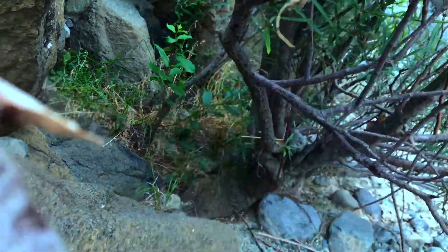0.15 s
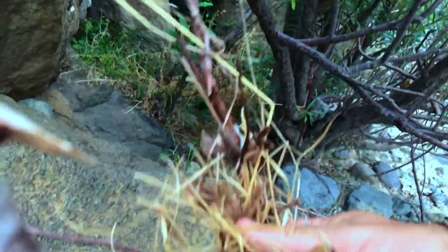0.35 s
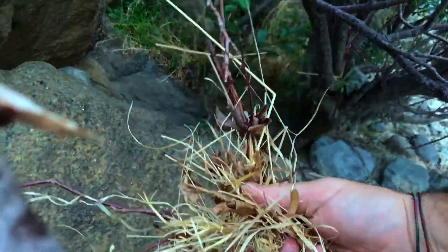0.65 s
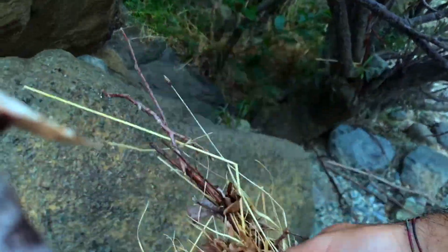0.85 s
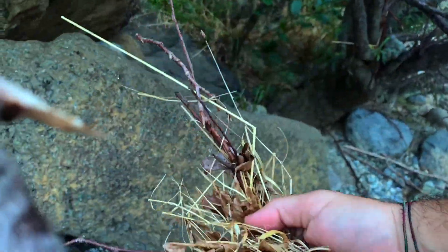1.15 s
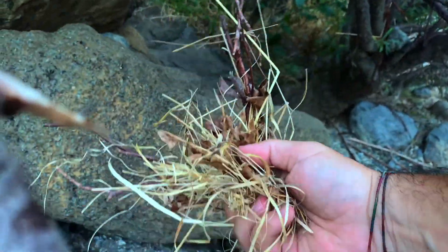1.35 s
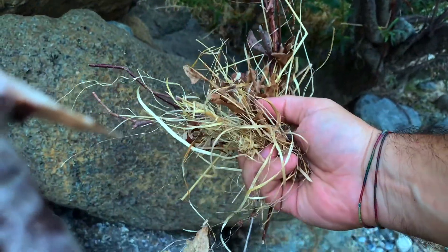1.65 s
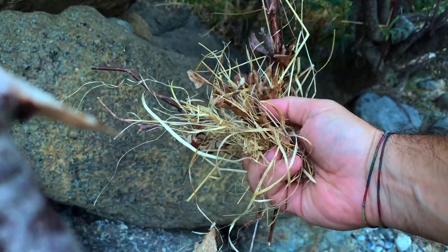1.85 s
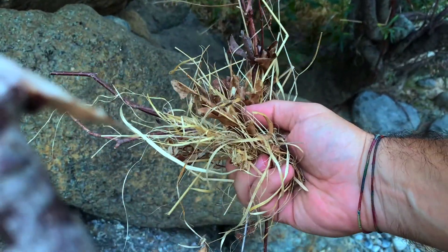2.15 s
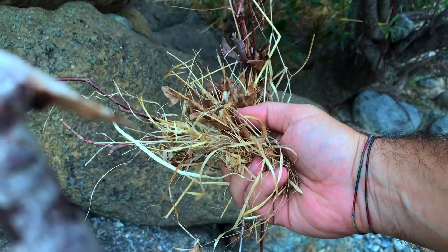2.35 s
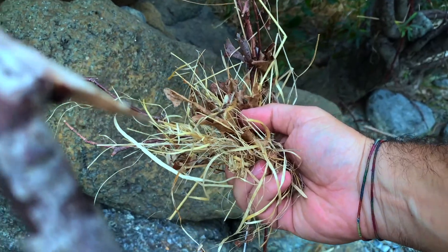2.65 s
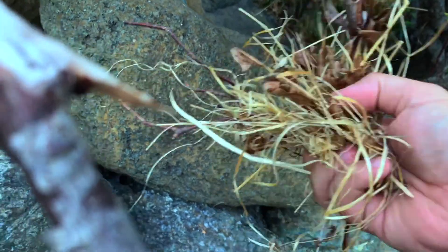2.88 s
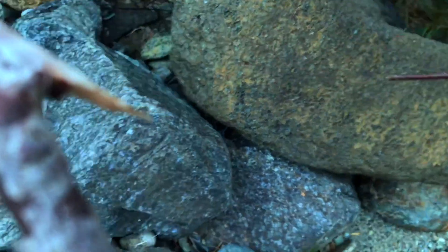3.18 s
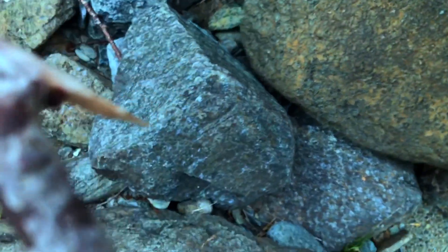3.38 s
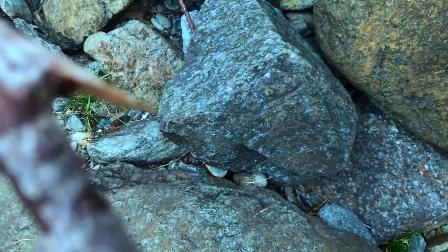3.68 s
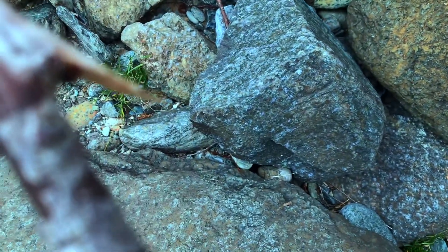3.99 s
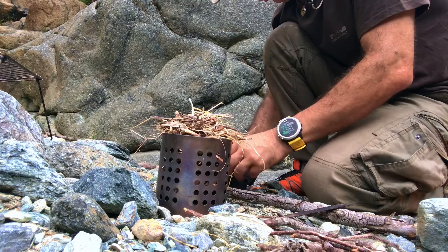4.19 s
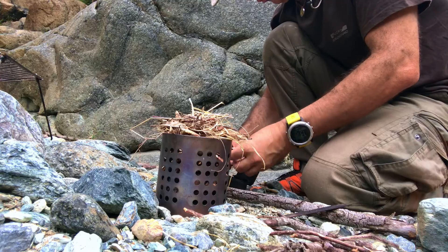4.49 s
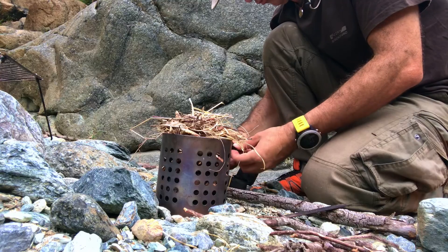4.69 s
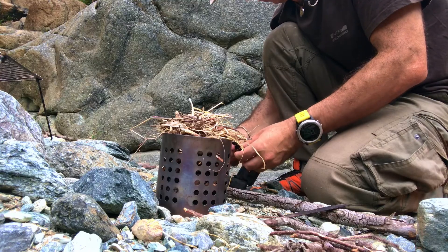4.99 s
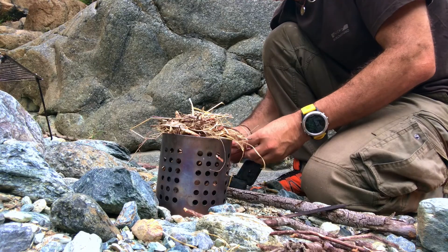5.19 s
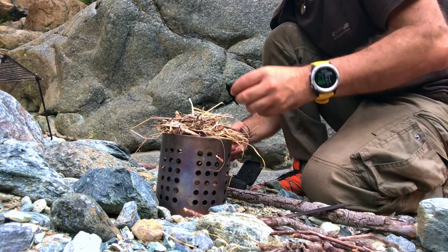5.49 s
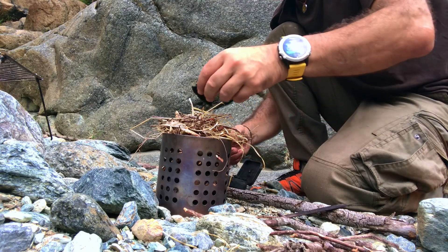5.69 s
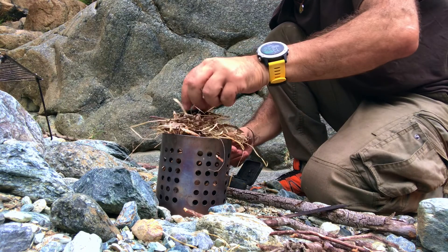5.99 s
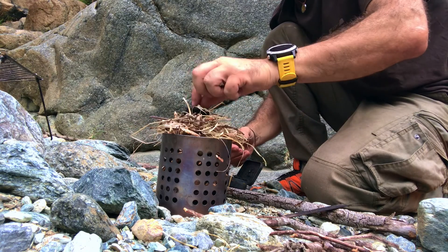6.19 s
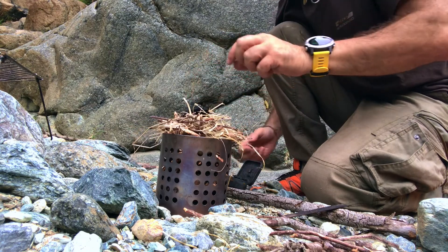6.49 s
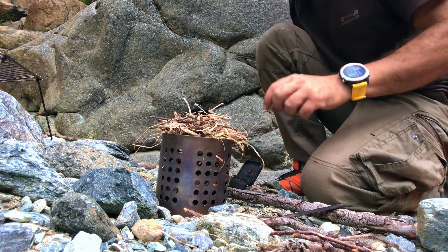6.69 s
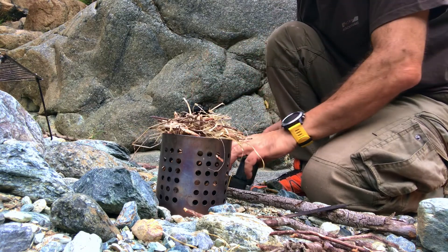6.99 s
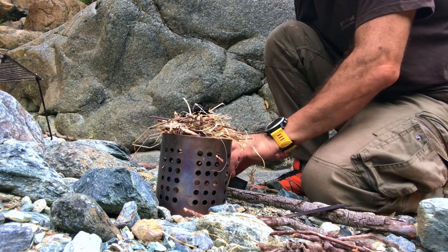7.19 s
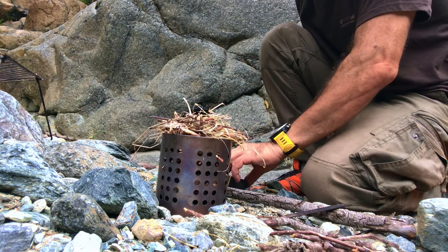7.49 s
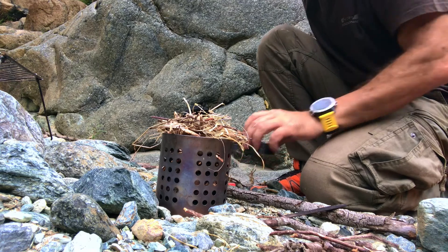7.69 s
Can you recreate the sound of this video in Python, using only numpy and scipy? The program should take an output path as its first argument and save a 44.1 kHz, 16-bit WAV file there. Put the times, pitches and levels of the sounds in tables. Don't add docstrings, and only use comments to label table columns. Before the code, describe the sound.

Cicadas pulse five times a second over a steady shrill chorus with dry grass crackles and soft wind, then river gurgling and a hollow clatter.

```python
import sys
import numpy as np
from scipy import signal
from scipy.fft import rfft, irfft, next_fast_len
from scipy.io import wavfile
from scipy.ndimage import uniform_filter1d

SR = 44100
rng = np.random.default_rng(int(sys.argv[2]) if len(sys.argv) > 2 else 0)


def magnitude_from_level(level_db):
    exponent = np.asarray(level_db, float) / 20
    return 10 ** exponent


def to_wav(sig):
    pcm = np.clip(np.atleast_2d(sig), -1, 1) * 32767
    pcm = np.round(pcm).astype(np.int16)
    wavfile.write(sys.argv[1], SR, pcm.T)


N = 346185

CUT_S, FADE_IN_S = 4.1953, 0.014
AIR_TURN_S, AIR_TURN_LENGTH_S = 1.9, 0.2
OVERTONES_HZ = 10400

# (frequency [Hz], density [dB per Hz])
DISTANT_WATER = [(150, -28.5), (250, -2), (396, -5), (464, -8), (562, -4.5), (698, -7), (1510, -8.5),
                 (1730, -8), (2000, -1.5), (2600, -13), (4400, -120)]
# (time [s], dying time [s], buffeting level [dB], rumble level [dB])
GUSTS = [(.13, 0.016, -49, -72), (.22, .04, -43, -57), (.42, 0.033, -42.5, -73), (.49, .03, -49, -67),
         (.6, .15, -57, -59), (.97, .02, -52, -57), (1.07, 0.056, -55, -50.5), (1.22, 0.087, -64, -53),
         (1.37, 0.13, -54, -55), (1.58, .03, -48, -60), (1.65, .05, -50, -66), (1.86, .06, -56, -53),
         (2.0, 0.13, -57.5, -52.5), (2.39, 0.051, -54, -51), (2.7, 0.13, -56, -54.5),
         (2.92, 0.19, -72, -55), (3.26, 0.064, -56, -71), (3.48, .08, -60, -62), (3.69, 0.049, -66, -51),
         (3.94, 0.044, -58, -56), (4.09, 0.018, -58, -56)]
# (time [s], dying time [s], level [dB])
SQUEEZES = [
    (.02, 0.051, -45),
    (2.9, .3, -60),
    (3.06, .1, -54),
    (3.26, 0.061, -47),
    (3.47, .06, -53),
]
# (time [s], peak level [dB])
STALK_SNAPS = [
    (0.0228, -33),
    (2.9914, -44),
    (3.0355, -40),
    (3.2136, -34),
    (3.2604, -35),
    (3.274, -34),
    (3.2884, -34),
    (3.5334, -45),
]
# (frequency [Hz], density [dB per Hz])
RIVER_WASH = [(82, -36), (140, -4), (225, -5), (276, -1), (317, -8.5), (356, -1.5), (486, -3), (565, -1.5),
              (840, -15), (1000, -25), (1500, -16), (1770, -17.5), (2200, -9), (2860, -40.5)]
# (time [s], dying time [s], level [dB])
SURGES = [(4.23, 0.046, -55), (4.34, 0.027, -57), (4.45, .06, -60), (4.6, 0.068, -54), (4.75, 0.083, -54),
          (5.25, .15, -58), (5.55, 0.045, -54), (5.85, .08, -56), (6.02, .1, -54.5), (6.42, 0.053, -58),
          (6.59, .03, -59), (6.69, .08, -60), (6.9, 0.048, -50.5), (7.1, .2, -59), (7.3, 0.22, -56),
          (7.5, .06, -56), (7.7, .1, -67)]
# (time [s], peak level [dB], frequency [Hz])
GURGLES = [(4.259, -45.5, 564), (4.799, -54, 575), (5.169, -52, 565), (5.538, -45.5, 362),
           (5.809, -46.5, 538), (5.966, -52, 224), (5.989, -50, 550), (6.109, -45.5, 358),
           (6.295, -42, 437), (6.488, -46, 530), (6.899, -51, 592), (7.148, -41.5, 539), (7.613, -48, 565)]
# (frequency [Hz], level [dB], T60 [s])
HOLLOW_MODES = [(560, 7.5, .035), (1036, 0, 0.034), (1140, -4, 0.063), (1320, 6, 0.015), (1773, 3.5, 0.029),
                (2250, 5, 0.025), (2475, -1, 0.029), (3150, -14, 0.015)]
# (time [s], peak level [dB], favoured frequency [Hz], spread [octaves])
KNOCKS = [(.004, -46.5, 1360, 0.2), (2.484, -51, 560, .4), (2.497, -36.5, 1350, .7),
          (7.248, -28, 1300, 1.6), (7.275, -36.5, 1070, 0.23), (7.333, -43, 1080, 0.14),
          (7.339, -47, 1140, 0.12), (7.3449, -23.5, 1400, 0.82), (7.355, -34, 1990, 0.76),
          (7.367, -42, 1000, 0.49), (7.375, -40, 554, 0.43), (7.382, -39, 554, .4), (7.388, -28, 590, 1.1),
          (7.397, -41, 1320, 0.15), (7.424, -49, 1320, 0.18), (7.475, -49, 1150, .4),
          (7.490, -55, 1140, .15), (7.596, -50.5, 1140, 0.3)]
# (frequency [Hz], density [dB per Hz])
FAR_BODY_BUSH = [(1400, -29), (1800, -24), (2200, -9.5), (2800, -11.5), (3400, -15.5), (3800, -8.5),
                 (4400, 4), (4900, -2.5), (6200, -2), (7300, -6), (8500, -12.5), (10300, -24),
                 (11000, -20.5), (15600, -29.5)]
# (frequency [Hz], density [dB per Hz])
FAR_BODY_BANK = [(1400, -20.5), (1800, -13.5), (2200, -5), (2800, -9.5), (3500, -19), (4100, -3.5),
                 (4500, 1), (4900, -1), (6200, -3), (7300, -4.5), (8500, -12.5), (10300, -22.5),
                 (11000, -22.5), (15600, -35)]
# (frequency [Hz], density [dB per Hz])
BODY_BUSH = [(1400, -39.5), (1800, -21), (2200, -9.5), (2800, -11.5), (3400, -19), (3800, -5), (4400, 3),
             (4900, -0.5), (6200, -4.5), (7300, -8), (8500, -14.5), (10300, -24.5), (11000, -22.5),
             (15600, -31.5)]
# (frequency [Hz], density [dB per Hz])
BODY_BANK = [(1800, -21.5), (2200, -7.5), (2800, -12.5), (3400, -28), (3800, -9.5), (4400, 1.5),
             (4900, -4.5), (6200, -5.5), (7300, -9.5), (8500, -12.5), (10300, -23), (11200, -24),
             (11900, -19.5), (15600, -39)]
# (time [s], length [s], level [dB], high singer level [dB])
PHRASES_BUSH = [(0.058, 0.12, -35.5, -52), (0.269, 0.096, -32.5, -66), (0.47, 0.11, -34.5, -56),
                (0.66, 0.098, -33.5, -47), (0.873, 0.1, -33, -46), (1.057, 0.098, -34, -50),
                (1.25, 0.13, -35, -46), (1.454, 0.09, -32.5, -54), (1.664, 0.093, -33.5, -53),
                (1.88, 0.066, -32, -49), (2.059, 0.1, -34, -51), (2.28, 0.092, -33, -63),
                (2.484, 0.085, -38, -47), (2.617, 0.15, -36, -53), (2.842, 0.13, -35.5, -58),
                (3.033, 0.099, -35, -62), (3.232, 0.097, -35, -51), (3.426, 0.078, -33.5, -47.5),
                (3.65, 0.072, -33.5, -43), (3.823, 0.07, -34.5, -41), (4.036, 0.068, -34.5, -38)]
# (time [s], length [s], level [dB])
PHRASES_BANK = [(4.31, 0.12, -39), (4.528, 0.11, -40), (4.744, 0.096, -38.5), (4.938, 0.098, -39),
                (5.149, 0.1, -38.5), (5.351, 0.098, -39.5), (5.555, 0.074, -39), (5.736, 0.1, -39.5),
                (5.938, 0.076, -38), (6.118, 0.1, -38.5), (6.329, 0.079, -40.5), (6.503, 0.12, -39),
                (6.714, 0.11, -38.5), (6.946, 0.067, -38), (7.113, 0.088, -38), (7.326, 0.088, -39),
                (7.519, 0.11, -38.5), (7.726, 0.094, -39)]
SINGER_EDGES = [1200, 2600, 3500, 4200, 4800, 5700, 6800, 8000, 9200, 10400, 11400, 12600, 14000, 17000]
# (frequency [Hz], width [Hz])
SOLOISTS = [
    (5370, 90),
    (2970, 160),
]
# (time [s], level [dB])
LOW_SINGER = [(0, -62), (1.5, -62), (1.7, -50.5), (2.7, -56), (2.9, -57), (4.2, -57)]
# (time [s], length [s], level [dB])
NEAREST = [
    (2.64, 0.06, -46),
    (3.073, 0.083, -44),
    (3.44, 0.055, -38.5),
    (3.841, 0.045, -35),
]


def rms_one(x):
    return x / np.sqrt(np.mean(x ** 2) + 1e-20)


def noise():
    return rng.standard_normal(N)


def colour(x, spectrum):
    size = 8192
    hz, db = np.transpose(spectrum)
    octave = np.log2(np.maximum(np.arange(size // 2 + 1) * SR / size, 1))
    below = np.maximum(np.log2(hz[0]) - octave, 0)
    log_gain = np.log(magnitude_from_level(np.interp(octave, np.log2(hz), db) - 18 * below))
    cepstrum = irfft(log_gain)
    cepstrum[1:size // 2] *= 2
    cepstrum[size // 2 + 1:] = 0
    response = irfft(np.exp(rfft(cepstrum)))
    return rms_one(signal.fftconvolve(x, response)[:N])


def band(x, low_hz, high_hz, order=2):
    sos = signal.butter(order, [low_hz, high_hz], "band", fs=SR, output="sos")
    return rms_one(signal.sosfilt(sos, x))


def around(x, hz, width_hz, order=2):
    return band(x, hz - width_hz / 2, hz + width_hz / 2, order)


def drift(rate_hz):
    step = 40
    r = np.exp(-2 * np.pi * rate_hz * step / SR)
    slow = signal.lfilter([1], [1, -2 * r, r * r], rng.standard_normal(N // step + 2002))[2000:]
    return np.interp(np.arange(N) / step, np.arange(len(slow)), rms_one(slow))


def clicks(per_s, uneven_db):
    sizes = magnitude_from_level(uneven_db * np.minimum(rng.exponential(1, N), 4)) * rng.choice([-1, 1], N)
    return sizes * (rng.random(N) < per_s / SR)


def bursts(events, levels_db, rise, calm_db):
    t, power = np.arange(0, N / SR + .01, .001), magnitude_from_level(2 * calm_db)
    for (s, dying, *_), db in zip(events, levels_db):
        climb = np.sin(np.pi / 2 * np.clip(1 + (t - s) / rise, 0, 1)) ** 2
        decay = np.exp(-2 * np.maximum(t - s, 0) / dying)
        power = power + magnitude_from_level(2 * db) * climb * decay
    return np.interp(np.arange(N) / SR, t, np.sqrt(power))


def swells(phrases, levels_db, rise, fall):
    out = np.zeros(N)
    for (s, length, *_), db in zip(phrases, levels_db):
        i = max(round((s - rise / 2) * SR), 0)
        t = np.arange(round((length + rise / 2 + fall / 2) * SR)) / SR
        opening = np.sin(np.pi / 2 * np.clip(t / rise, 0, 1))
        closing = np.sin(np.pi / 2 * np.clip((t[-1] - t) / fall, 0, 1))
        shape = (opening * closing)[:N - i] ** 2
        out[i:i + len(t)] += magnitude_from_level(db) * shape
    return out


def distant_water():
    t = np.arange(N) / SR
    turned = np.clip((t - AIR_TURN_S) / AIR_TURN_LENGTH_S, 0, 1)
    air = magnitude_from_level(-58 - 0.76 * turned) * colour(noise(), DISTANT_WATER)
    rapid = magnitude_from_level(-68) * around(noise(), 1030, 320)
    return air + rapid * (1 - turned)


def wind():
    buffet_db, rumble_db = np.array(GUSTS)[:, 2:].T
    rise_s = 0.038
    buffet = band(noise(), 40, 103, order=3) * magnitude_from_level(1.2 * drift(19.0))
    buffet = buffet * bursts(GUSTS, buffet_db, rise_s, calm_db=-62.5)
    rumble = band(noise(), 85, 204) * magnitude_from_level(0.35 * drift(8.0))
    rumble = rumble * bursts(GUSTS, rumble_db, rise_s, calm_db=-58)
    lull = np.clip((np.arange(N) / SR - 4.1) / .04, 0, 1)
    return (buffet + rumble) * magnitude_from_level(-10 * lull)


def river():
    out = magnitude_from_level(-56 + 0.85 * drift(27.0)) * colour(clicks(per_s=1500, uneven_db=-0.5), RIVER_WASH)
    surge_db = np.array(SURGES)[:, 2]
    out += band(noise(), 79.6, 113.5) * bursts(SURGES, surge_db, rise=0.049, calm_db=-62.5)
    out += band(noise(), 38, 66, order=3) * magnitude_from_level(-75)
    t = np.arange(round(.08 * SR)) / SR
    envelope = (1 - np.exp(-t / 0.0055)) * np.exp(-t / 0.013)
    for s, db, hz in GURGLES:
        i = round(s * SR)
        out[i:i + len(t)] += magnitude_from_level(db + 5.0) * envelope * np.sin(2 * np.pi * hz * t * (1 + 0.5 * t))
    return out


def air_pocket():
    return around(noise(), 565, 47, order=1) * magnitude_from_level(-63.5 + 2.2 * drift(11.0))


def grass():
    snaps, t = np.zeros(N), np.arange(round(.004 * SR)) / SR
    for s, db in STALK_SNAPS:
        i = round(s * SR)
        snaps[i:i + len(t)] = magnitude_from_level(db + 4) * rng.choice([-1, 1], len(t)) * np.exp(-t / .0004)
    bright = signal.butter(2, 8000, "high", fs=SR, output="sos")
    crackle = band(clicks(per_s=2700, uneven_db=3.0), 10000, 17500)
    squeeze = bursts(SQUEEZES, np.array(SQUEEZES)[:, 2], rise=0.064, calm_db=-76)
    return crackle * squeeze + signal.sosfilt(bright, snaps)


def knocks():
    out, t = np.zeros(N), np.arange(round(.06 * SR)) / SR
    dull = signal.butter(2, [500, 3000], "band", fs=SR, output="sos")
    build_up = 1 - np.exp(-(t / 0.0013) ** 2)
    for s, db, favoured_hz, spread in KNOCKS:
        body = np.zeros(len(t))
        for k, (hz, mode_db, t60) in enumerate(HOLLOW_MODES):
            level_db = mode_db - 6 * (np.log2(hz / favoured_hz) / spread) ** 2
            body += magnitude_from_level(level_db - 60 * t / t60) * np.sin(2 * np.pi * hz * t + 3 * k)
        body = body * build_up
        white = rng.standard_normal(len(t) + 1)
        crack = np.diff(white) * np.exp(-t / 0.0033)
        grit = signal.sosfilt(dull, white[1:]) * np.exp(-t / 0.0057) * min(spread, 1)
        i = round(s * SR)
        out[i:i + len(t)] += magnitude_from_level(db) * (body / np.abs(body).max() + magnitude_from_level(-30) * crack + magnitude_from_level(-5.5) * grit)
    return out


def chorus(level_db, overtones_db, body):
    voices = colour(noise(), body)
    main, overtones = [signal.sosfiltfilt(signal.butter(4, OVERTONES_HZ, kind, fs=SR, output="sos"), voices)
                       for kind in ("low", "high")]
    return magnitude_from_level(level_db + 0.5 + 0.51 * drift(2.6)) * (main + magnitude_from_level(overtones_db) * overtones)


def echoes(x, t60=0.68, level_db=-9):
    t = np.arange(round(.4 * SR)) / SR
    tail = rng.standard_normal(len(t)) * magnitude_from_level(-60 * t / t60) * (t > .01)
    return x + magnitude_from_level(level_db) * signal.fftconvolve(x, tail / np.sqrt(np.sum(tail ** 2)))[:N]


def singers(phrases, body, usual_db, overtones_db, rise, fall):
    table, out, size = np.array(phrases), 0, next_fast_len(N, real=True)
    start_s, length_s, phrase_db = table[:, :3].T
    spectrum = rfft(colour(clicks(per_s=6000, uneven_db=1.0), body), size)
    hz = np.arange(size // 2 + 1) * SR / size
    for low, high in zip(SINGER_EDGES, SINGER_EDGES[1:]):
        early_s, longer_s, louder_db = rng.standard_normal((len(table), 3)).T * [[.006], [.008], [1.3]]
        share = np.clip((hz - low) / 200 + .5, 0, 1) - np.clip((hz - high) / 200 + .5, 0, 1)
        level_db = phrase_db - 3.5 + louder_db
        part = 1
        if low >= OVERTONES_HZ:
            part = 0.77
            level_db = level_db + overtones_db + (0.39 - 1) * (phrase_db - usual_db)
        timing = np.c_[start_s - early_s + (1 - part) / 2 * length_s, part * length_s + longer_s]
        out = out + irfft(spectrum * share, size)[:N] * swells(timing, level_db, rise, fall)
    return out


def narrow_voice(hz, width_hz):
    ring = around(noise(), hz, width_hz)
    power = uniform_filter1d(ring ** 2, size=200)
    return rms_one(ring / (power + .15) ** 0.23)


def soloists():
    table = np.array(PHRASES_BUSH)
    middle = table[:, :2] * [1, 0.7] + [0.011, 0]
    low_db = np.interp(table[:, 0], *np.transpose(LOW_SINGER))
    high, low = [narrow_voice(hz, width_hz) for hz, width_hz in SOLOISTS]
    high = high + magnitude_from_level(-17) * narrow_voice(12400, 2600)
    out = narrow_voice(4630, 260) * swells(NEAREST, np.array(NEAREST)[:, 2], rise=.015, fall=0.011)
    out = out + narrow_voice(10900, 300) * swells(middle, table[:, 2] - 32, rise=.03, fall=.02)
    out = out + high * swells(middle, table[:, 3], rise=0.018, fall=.012)
    return out + low * swells(middle, low_db, rise=0.017, fall=.012)


def cicadas():
    bush = singers(PHRASES_BUSH, BODY_BUSH, usual_db=-35, overtones_db=4.5, rise=0.085, fall=0.055)
    bush = echoes(bush + soloists()) + chorus(-40.5, 1.5, FAR_BODY_BUSH)
    bank = singers(PHRASES_BANK, BODY_BANK, usual_db=-38.5, overtones_db=0, rise=0.089, fall=.06)
    bank = echoes(bank) + chorus(-47.5, 0.1, FAR_BODY_BANK)
    return bush, bank


def scene():
    t = np.arange(N) / SR
    bush, bank = cicadas()
    bush = distant_water() + wind() + grass() + bush
    bank = river() + air_pocket() + bank
    mono = bush * (t < CUT_S) + bank * np.clip((t - CUT_S) / FADE_IN_S, 0, 1) + knocks()
    return np.array([mono, mono])


def top_cut(x):
    return signal.sosfilt(signal.butter(12, 16410, fs=SR, output="sos"), x)


def record(dry):
    low_pass = signal.ellip(14, .5, 70, 15740, fs=SR, output="sos")
    mix = signal.sosfilt(low_pass, dry)
    return top_cut(mix)


dry = scene()
out = record(dry)
to_wav(out)
```